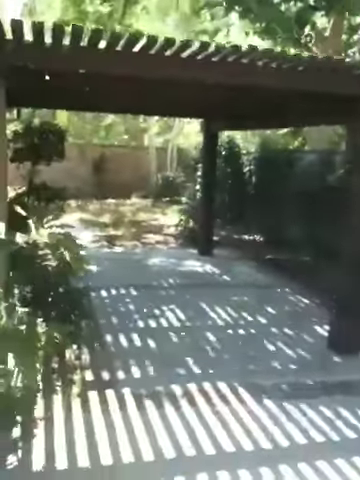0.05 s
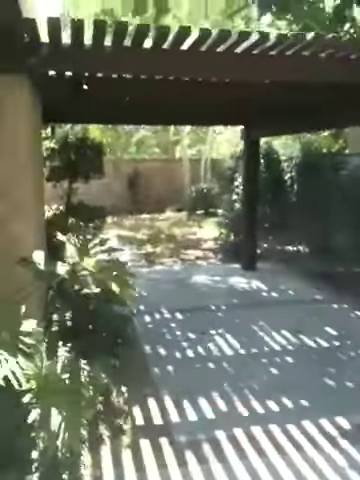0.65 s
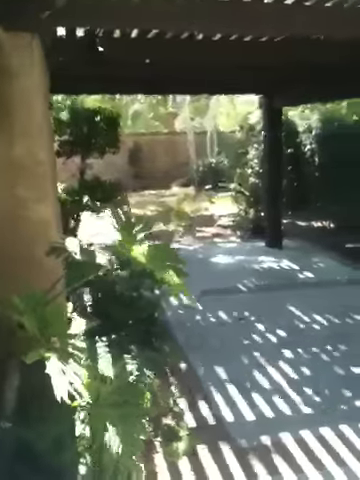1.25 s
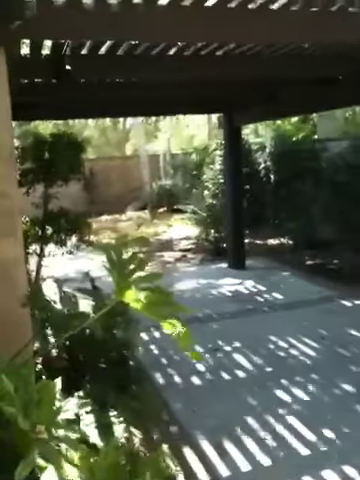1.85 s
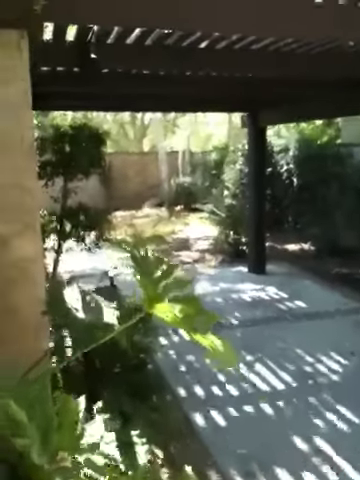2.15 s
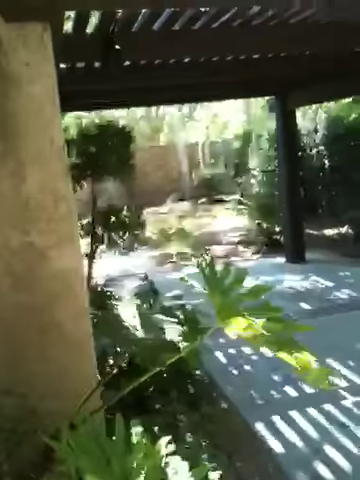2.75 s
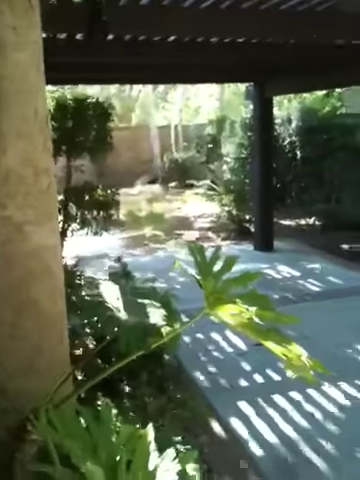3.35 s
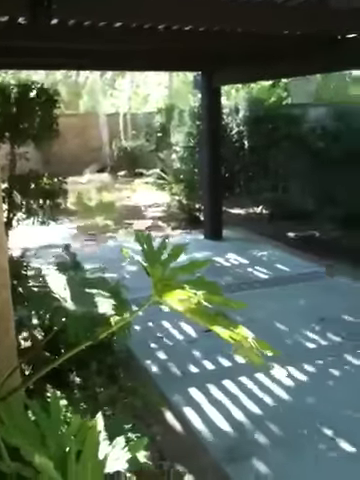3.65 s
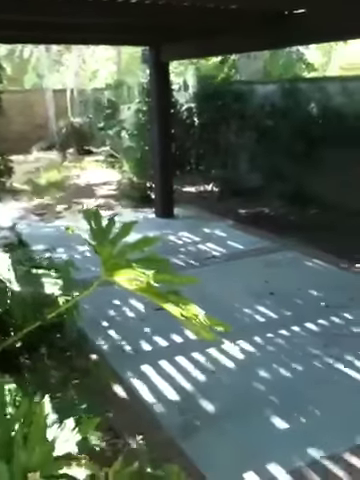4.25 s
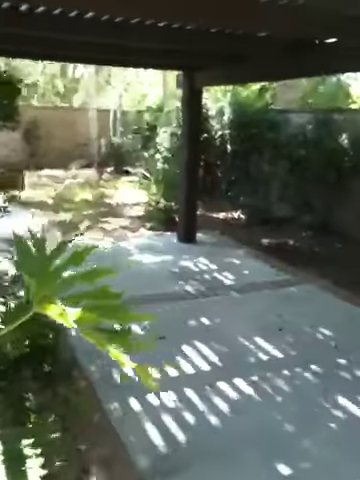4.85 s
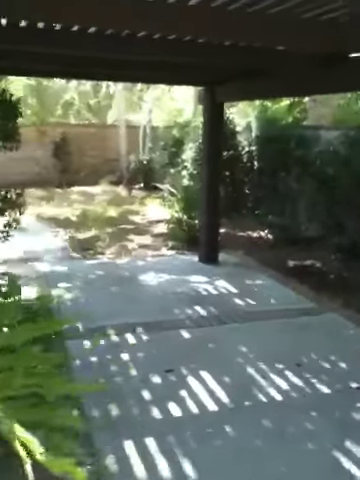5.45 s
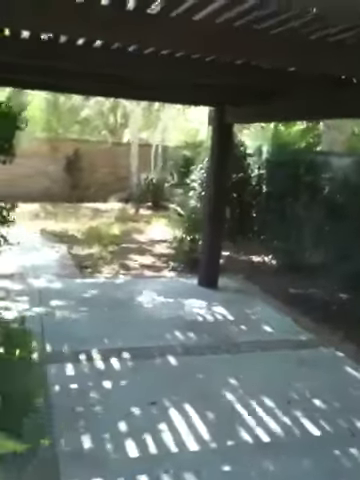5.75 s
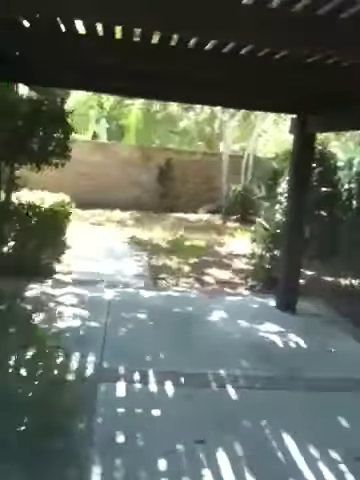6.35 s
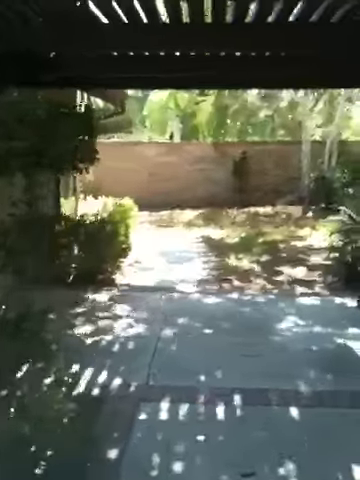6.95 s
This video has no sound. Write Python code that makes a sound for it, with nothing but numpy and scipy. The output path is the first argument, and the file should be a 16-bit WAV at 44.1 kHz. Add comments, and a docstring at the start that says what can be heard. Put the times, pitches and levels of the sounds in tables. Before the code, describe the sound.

A big leaf brushes the microphone with a loud crackle and raspy drag, over a soft garden hush and faint birdsong.

```python
"""The soft hush of a quiet backyard, then a small bird some way off and puffs of air bumping the microphone.
A phone is being carried past a big-leaved plant. Stalks knock on its case and leaf tips flick it now and
then. Loudest of all, one leaf taps the case, swishes across the microphone in a bright crackle and drags
along the body for a second, sticking and slipping so that the case rings. The bird's arched whistles
carry on over the last light touches."""
import sys
import numpy as np
from scipy import signal
from scipy.fft import rfft, irfft
from scipy.io import wavfile
from scipy.ndimage import uniform_filter1d

SR = 44100
rng = np.random.default_rng(int(sys.argv[2]) if len(sys.argv) > 2 else 0)


def generate_wav(sig):
    """Save sig (samples, or channels by samples) to the path in sys.argv[1] as 16-bit PCM at SR."""
    pcm = np.round(np.clip(np.atleast_2d(sig).T, -1, 1) * 32767).astype(np.int16)
    wavfile.write(sys.argv[1], SR, pcm)


N = 312919
T = np.arange(N) / SR


def amp(db):
    return 10 ** (np.asarray(db) / 20)


def unit(x):
    """Scale to rms 1."""
    return x / np.sqrt(np.mean(x ** 2) + 1e-18)


def colour(x, points, size=4096):
    """Causal EQ through (freq_hz, gain_db) points; white noise keeps its power."""
    hz, db = np.transpose(points)
    f = np.maximum(np.arange(size // 2 + 1) * SR / size, 1)
    low_cut = np.minimum(f / hz[0], 1)
    gain = low_cut * amp(np.interp(np.log(f), np.log(hz), db))
    cepstrum = irfft(np.log(gain))
    cepstrum[1:size // 2] *= 2  # fold to minimum phase
    cepstrum[size // 2 + 1:] = 0
    response = irfft(np.exp(rfft(cepstrum)))
    return signal.fftconvolve(x, response / np.linalg.norm(response))[:len(x)]


def resonate(x, hz, width_hz):
    """One resonance, gain 1 at its centre."""
    return signal.lfilter(*signal.iirpeak(hz, hz / width_hz, fs=SR), x)


def resonate_twice(x, hz, width_hz):
    """The same resonance in series, for steeper skirts."""
    return resonate(resonate(x, hz, width_hz), hz, width_hz)


def walk(per_s):
    """Smooth random modulation with rms 1."""
    step = max(int(SR / per_s), 1)
    held = np.repeat(rng.standard_normal(N // step + 1), step)
    return unit(uniform_filter1d(held, step)[:N])


def crackle(per_s, spread_db):
    """Tiny fibre releases at random moments: many small, a few large."""
    happens = rng.random(N) < per_s / SR
    size = amp(spread_db * np.minimum(rng.exponential(size=N), 4))
    return unit(happens * size * rng.choice([-1, 1], N))


def fall(t, t60):
    """A decay that loses 60 dB in t60 seconds."""
    return np.exp(-np.log(1000) * t / t60)


def after(s):
    """Seconds since time s, 0 before it."""
    return np.maximum(T - s, 0)


def before(s):
    """Seconds until time s, 0 after it."""
    return np.maximum(s - T, 0)


def swells(table):
    """A bell-shaped gain for each (middle_s, level_db, half_length_s) row."""
    return sum(amp(db) * np.exp(-.5 * ((T - s) / half) ** 2) for s, db, half in table)


def burst(envelope, grain):
    """Random grain under an envelope, which alone sets its energy."""
    return unit(envelope * grain) * np.sqrt(np.mean(envelope ** 2))


def add(out, s, x):
    """Mix x in at time s."""
    i = int(s * SR)
    out[i:i + len(x)] += x[:len(out) - i]


# level of the garden bed as the phone is carried along: time_s, murmur_db, hiss_db
HUSH_LEVELS = [(0, -57, -53.5), (1.2, -58, -54.5), (2.3, -58.5, -56), (4.1, -59, -57), (6.2, -57, -55),
               (6.8, -55.5, -54), (7.1, -56.3, -51.5)]
# EQ of the low town murmur: freq_hz, gain_db
MURMUR_EQ = [(25, -46), (50, -18), (90, -9), (160, 0.5), (260, 1.5), (450, -2.5), (1000, -3), (1600, -9.5),
             (3000, -31)]
# EQ of the leafy hiss: freq_hz, gain_db
FOLIAGE_EQ = [(900, -10.5), (1700, -4), (2400, -0.5), (3300, -3.5), (5000, -7.5), (7000, -9), (9200, -10.5),
              (11500, -18.5), (15500, -31)]


def garden():
    """A far murmur of the town under a soft hiss of foliage."""
    s, murmur_db, hiss_db = np.transpose(HUSH_LEVELS)
    murmur_gain = amp(np.interp(T, s, murmur_db) + 0.099 * walk(3.35))
    murmur = colour(rng.standard_normal(N), MURMUR_EQ)
    hiss_gain = amp(np.interp(T, s, hiss_db) + 0.24 * walk(9.2))
    hiss = colour(rng.standard_normal(N), FOLIAGE_EQ)
    return murmur_gain * murmur + hiss_gain * hiss


def whistle(hz, rasp):
    """A near-pure tone on a pitch curve, roughened by a fast tremor and fading at both ends."""
    hz = hz * (1 + rasp * walk(700)[:len(hz)])
    return signal.windows.tukey(len(hz), .35) * np.sin(2 * np.pi * np.cumsum(hz) / SR)


# song notes, each an arch in pitch: crest_s, rise_s, fall_s, crest_hz, end_hz, level_db
SONG_NOTES = [(.705, 0, 0.052, 3270, 2600, -61), (4.63, 0.0093, 0.03, 3760, 3680, -58),
              (4.775, 0.0065, 0.053, 4250, 3080, -57), (5.035, 0.002, 0.026, 3670, 2970, -56),
              (5.148, 0.014, 0.015, 3210, 2800, -51.5), (5.245, 0.0013, 0.037, 4060, 2880, -51.5),
              (5.355, 0.0024, 0.025, 2820, 2600, -54), (5.435, 0.051, 0.041, 3970, 2950, -52.5),
              (5.534, 0.0056, .066, 4060, 2560, -55), (5.744, 0.061, 0.048, 3970, 2600, -53.5),
              (6.095, 0.0017, 0.037, 3180, 2630, -55), (6.338, 0.06, 0.039, 2990, 2300, -55.5)]
# thin high calls that slide down toward a pitch: start_s, pitch_hz, level_db, slide_hz
PEEP_CALLS = [(1.108, 4760, -56.5, 700), (4.39, 4650, -62, 300), (4.72, 4020, -60, 50),
              (6.785, 4030, -53.5, 250)]


def bird(size=16384):
    """Arched whistles and thin peeps, scattered by foliage and echoed by the garden walls."""
    foot_hz, roundness = 2640, 1.3
    peep_s, slide_t60_s = 0.08, 0.118
    flicker_db, echo_db, echo_t60_s = 2.4, -4.5, .22
    song = np.zeros(N)
    for crest, rise, drop, top_hz, end_hz, db in SONG_NOTES:
        up = (top_hz - foot_hz) * np.linspace(1, 0, int(abs(rise) * SR)) ** roundness
        down = (top_hz - end_hz) * np.linspace(0, 1, int(drop * SR)) ** roundness
        add(song, crest - rise, amp(db) * whistle(top_hz - np.r_[up, down], rasp=.016))
    slide = fall(T[:int(peep_s * SR)], slide_t60_s)
    for s, hz, db, slide_hz in PEEP_CALLS:
        add(song, s, amp(db) * whistle(hz + slide_hz * slide, rasp=0.02))
    walls = rng.standard_normal(size) * fall(T[:size], echo_t60_s)
    echo = signal.fftconvolve(song, walls / np.linalg.norm(walls))[:N]
    return song * amp(flicker_db * walk(170)) + amp(echo_db) * echo


# air bumping the microphone: middle_s, level_db, half_length_s
AIR_PUFFS = [(.795, -37.5, 0.018), (.843, -45.5, 0.016), (1.02, -52.5, 0.022), (1.2, -58.5, .054),
             (2.54, -53, 0.024), (4.785, -56.5, .008)]
# EQ of their soft thump: freq_hz, gain_db
PUFF_EQ = [(30, -53), (60, -10), (95, -4), (160, 0.5), (250, -11), (360, -16), (520, -44), (2000, -73)]


def puffs():
    """Eddies of air push on the microphone in soft thumps that stay above the deepest bass."""
    eddies = colour(rng.standard_normal(N), PUFF_EQ)
    strength = np.sqrt(uniform_filter1d(eddies ** 2, size=1500) + 1e-9)
    push = swells(AIR_PUFFS) * eddies / strength  # evened out inside each puff
    return signal.sosfilt(signal.butter(4, 88, "high", fs=SR, output="sos"), push)


# stalks hitting the case: start_s, level_db, clatter_t60_s, body_hz, tick_vs_body_db
STALK_KNOCKS = [(1.333, -49.5, 0.024, 1600, 7), (1.8944, -40, 0.062, 2220, 2),
                (2.164, -52.5, 0.089, 1600, -5), (2.469, -36.5, 0.065, 1224, -3),
                (2.484, -40.5, 0.075, 2420, -5), (2.493, -43, 0.07, 1400, 0),
                (4.293, -49.5, 0.022, 2390, 4.5), (4.8113, -51, 0.034, 1790, 2),
                (5.891, -46.5, 0.029, 3130, -4)]
# hollow ring of a knock: ratio_to_body, level_db, t60_s
HOLLOW_MODES = [(1, -1.5, 0.034), (1.3, -3, .025), (1.66, 0, .025)]
# EQ of the tick and clatter: freq_hz, gain_db
CLATTER_EQ = [(300, -3.5), (900, -1.5), (1500, 0), (2300, 8.5), (3200, -3.5), (5000, -3), (9000, -5),
              (15000, -16)]


def knocks(size=8192):
    """A stalk hits the case: a sharp tick and clatter, a hollow knock and a dull ring."""
    ticks, rings, t = np.zeros(N), np.zeros(N), T[:size]
    for s, db, t60, hz, tick_db in STALK_KNOCKS:
        clatter, push = rng.standard_normal((2, size))
        hollow = sum(amp(mode_db) * fall(t, mode_t60) * np.sin(2 * np.pi * ratio * hz * t)
                     for ratio, mode_db, mode_t60 in HOLLOW_MODES)
        dull = burst(fall(t, t60 * 2.6), resonate_twice(push, hz, width_hz=580))
        envelope = amp(-0.5) * fall(t, t60) + amp(2.5) * fall(t, t60=0.0042)
        add(ticks, s, amp(db + tick_db) * clatter * envelope)
        add(rings, s, amp(db) * (hollow + amp(-1.0) * dull))
    return colour(ticks, CLATTER_EQ) + rings


# leaf tips snapping off the phone: start_s, level_db, spray_t60_s, pitch_hz
TIP_FLICKS = [(1.260, -41.5, 0.016, 6500), (1.333, -44, .014, 4000), (2.002, -47, .006, 8300),
              (2.044, -49.5, .04, 9000), (2.543, -22.5, 0.037, 4030), (2.546, -24.5, .035, 5600),
              (2.563, -19, 0.054, 4200), (2.571, -16, 0.026, 7650), (2.6085, -23, 0.011, 6000),
              (2.702, -19, 0.0086, 8300), (2.710, -22, 0.024, 8400), (2.720, -26, .008, 5800),
              (2.725, -17, 0.0083, 5800), (2.746, -9.5, 0.0083, 5200), (2.761, -17, .006, 9400),
              (2.772, -15.5, 0.0076, 9100), (2.783, -18, .005, 9300), (2.790, -18.5, .013, 9600),
              (2.82, -31, .012, 8000), (3.009, -31.5, 0.062, 6470), (3.155, -28, .015, 6960),
              (3.164, -29, 0.015, 9250), (3.441, -26.5, 0.039, 8100), (3.4534, -25, 0.031, 8000),
              (3.9146, -33.5, 0.007, 8900), (4.499, -36, 0.014, 8000), (4.506, -40.5, 0.06, 5000),
              (4.515, -35, 0.02, 7800), (4.522, -36.5, 0.068, 7660), (4.5917, -42, 0.013, 8800),
              (4.8977, -31.5, .014, 9850), (4.902, -34, 0.033, 9300), (4.9112, -36, 0.049, 10500),
              (5.7105, -43, .02, 4300)]
# light grazes of foliage: middle_s, level_db, half_length_s
LEAF_GRAZES = [(1.99, -60, 0.056), (2.535, -50.5, .014), (4.80, -62.5, 0.059), (4.92, -54, 0.048)]
# crisp EQ of a leaf tip: freq_hz, gain_db
TIP_EQ = [(800, -23), (1700, -13), (2500, -13), (3400, -4.5), (5500, -1.5), (8800, 1), (10500, 0),
          (12500, -7.5), (15500, -14)]
# midrange EQ of a fluttering leaf blade: freq_hz, gain_db
FLUTTER_EQ = [(180, -28), (350, -20), (650, -30), (1200, -9.5), (1380, -10.5), (1900, -6.5), (2850, -4.5),
              (3400, -8), (5000, -8.5), (9000, -18.5)]


def flicks(size=8192):
    """Each leaf tip lets go with a snap, a spray of clicks and its own ring; grazes only whisper."""
    tips, t = np.zeros(N), T[:size]
    rise_s, ring_db = 0.00016, 3
    attack = np.minimum(t / rise_s, 1)
    snap = amp(0.5) * fall(t, t60=0.0023)
    clumps = unit(amp(2.2 * np.tanh(walk(900))))
    for s, db, t60, hz in TIP_FLICKS:
        spray = amp(-1.0) * burst(fall(t, t60), clumps[int(s * SR):][:size])
        push = (snap + spray) * attack * rng.choice([-1, 1], size)
        add(tips, s, amp(db) * (push + amp(ring_db) * resonate(push, hz, width_hz=710)))
    grazes = swells(LEAF_GRAZES) * unit(crackle(9000, 2.6) * amp(1.9 * np.tanh(walk(250))))
    flutter = amp(1.5) * colour(grazes, FLUTTER_EQ)  # a graze also stirs the whole blade
    return colour(amp(-2.5) * tips + grazes, TIP_EQ) + flutter


# soft tips wiping past: middle_s, level_db, half_length_s, pitch_hz
TIP_BRUSHES = [(4.37, -54, 0.012, 8000), (4.608, -53, .004, 9000), (5.719, -55, .007, 8000),
               (6.25, -42.5, .0011, 8200), (6.272, -43.5, .0014, 8800), (6.289, -44, .002, 9000),
               (6.301, -41, 0.0028, 8600)]


def brushes(size=4096):
    """Soft leaf tips wipe past without a snap: each a short, high fizz."""
    out, t = np.zeros(N), T[:size] - T[size // 2]
    for s, db, half, hz in TIP_BRUSHES:
        fibres = colour(rng.laplace(size=size), TIP_EQ)
        bell = np.exp(-.5 * (t / half) ** 2)
        add(out, s + t[0], amp(db) * burst(bell, resonate(fibres, hz, width_hz=2900)))
    return out


# narrow rings of the phone case: pitch_hz, width_hz, level_db
CASE_MODES = [(530, 82, -8), (1878, 32, 0.5), (2085, 12, 5.5), (2385, 14, 1.5), (2777, 23, 2.5),
              (3250, 34, 2), (4027, 27, 3.5), (4450, 15, 5), (5860, 160, -5.5), (8180, 130, -7)]


def case(x):
    """The leaves' contact sets the phone case ringing."""
    rings = sum(amp(db) * resonate(x, hz, width) for hz, width, db in CASE_MODES)
    return amp(-1.31) * (x + amp(-0.5) * rings)


def wander(x, rings_hz, depth_db=4):
    """As the point of contact moves, each ring of the blade comes and goes on its own."""
    return x + sum((amp(depth_db * np.tanh(walk(per_s=55))) - 1) * resonate(x, hz, width_hz=700)
                   for hz in rings_hz)


def cracks(size=1024):
    """Ribs of the blade tick over the edge of the case, each at its own pitch and strength."""
    per_s, spread_db, ring_cycles = 190, 1.5, 40
    low_hz, high_hz = 1830, 4860
    out, t = np.zeros(N), T[:size]
    for when, pitch, chance in rng.random((int(per_s * N / SR), 3)):
        hz = low_hz * (high_hz / low_hz) ** pitch
        db = spread_db * min(-np.log(1 - chance), 3)
        add(out, when * T[-1], amp(db) * fall(t, ring_cycles / hz) * np.sin(2 * np.pi * hz * t))
    return out


# the blade briefly loses its grip: middle_s, share_lost_db, half_length_s
GRIP_LIFTS = [(2.865, -9, 0.014), (3.11, -12, 0.013), (3.365, -9, 0.011), (3.65, -9, 0.011)]
# EQ of the raspy scrape: freq_hz, gain_db
SCRAPE_EQ = [(700, -19), (1100, -13), (1550, -7), (1900, -3), (2300, 1.5), (2800, -5), (3600, -7.5),
             (4300, -4), (5200, -10), (7000, -44)]
# EQ of the friction hiss on top: freq_hz, gain_db
HISS_EQ = [(3500, -2), (5500, 0), (7500, -0.5), (9500, -3), (11500, -11), (15500, -25)]
# EQ of the rumble underneath: freq_hz, gain_db
RUMBLE_EQ = [(100, -23), (200, 0), (330, 2.5), (500, 0), (750, -2.5), (1200, -5), (2000, -26.5)]


def drag():
    """The blade rubs along the case: scrape, cracks, hiss, rumble and boom all follow its pressure."""
    lands_s, firm_s, eases_s, clears_s = 2.74, 3.012, 3.45, 3.816
    press_db_per_s, ease_db_per_s, clear_db_per_s = 31, 23.5, 124
    scrape_db, crack_db, hiss_db, rumble_db, boom_db = -35.5, -33.5, -41, -43, -50.5
    pressure = (T > lands_s) * amp(-press_db_per_s * before(firm_s)
                                   - ease_db_per_s * after(eases_s)
                                   - clear_db_per_s * after(clears_s))
    contact = pressure * np.maximum(1 - swells(GRIP_LIFTS), 0)
    grip = unit(amp(1.3 * np.tanh(walk(110)) + 0.97 * walk(350)))
    scrape = wander(colour(grip * crackle(1600, 0.72), SCRAPE_EQ), rings_hz=(2200, 2900, 4300))
    boom = unit(resonate_twice(crackle(3000, 0.6), hz=174, width_hz=113))  # the whole phone shakes
    ribs = cracks()
    hiss = colour(grip * crackle(5000, 2.8), HISS_EQ)
    rumble = colour(crackle(1500, 0.57), RUMBLE_EQ)
    return (contact * (amp(scrape_db) * scrape + amp(crack_db) * ribs)
            + amp(hiss_db) * pressure ** 0.87 * hiss
            + amp(rumble_db) * pressure * rumble
            + amp(boom_db) * pressure ** 0.44 * boom)


# the blade catches and lets go: start_s, level_db, pitch_hz, t60_s
BLADE_SLIPS = [(2.635, -27, 2670, 0.22), (2.745, -30, 5200, .014), (2.773, -31, 2270, 0.064),
               (2.79, -34.5, 2280, 0.095), (2.888, -27, 2290, 0.087), (2.921, -27, 2350, 0.03),
               (2.9802, -32, 2070, 0.029), (2.98, -33.5, 2920, 0.043), (3.0035, -18, 2830, 0.012),
               (3.01, -28, 2850, 0.086), (3.044, -27, 2260, 0.11), (3.063, -24.5, 2460, 0.026),
               (3.14, -30.5, 3076, 0.1), (3.14, -37, 2110, 0.06), (3.183, -28, 2310, .09),
               (3.185, -34.5, 4260, .09), (3.2255, -27.5, 2180, 0.045), (3.242, -30.5, 2220, 0.07),
               (3.26, -34, 3980, 0.096), (3.29, -31, 2430, 0.2), (3.384, -29.5, 4240, .08),
               (3.398, -25, 2370, 0.032), (3.498, -33, 3250, .09), (3.693, -34.5, 2500, 0.045),
               (4.8973, -44, 2520, 0.038)]


def slips(size=8192):
    """Each time the blade lets go it judders in uneven jerks, at its own pitch and with a broad rasp."""
    out, t = np.zeros(N), T[:size]
    jerks = crackle(per_s=2000, spread_db=2.0)
    rasp = amp(-10) * colour(jerks, FLUTTER_EQ)
    for s, db, hz, t60 in BLADE_SLIPS:
        i = int(s * SR)
        judder = unit(resonate_twice(jerks[i:i + size], hz, width_hz=800))
        add(out, s, amp(db) * burst(fall(t, t60), judder + rasp[i:i + size]))
    return out


# strokes of the leaf edge over the microphone port: start_s, hold_s, level_db
EDGE_STROKES = [(2.55, 0.018, -31.5), (2.639, 0.098, -23)]
# bright EQ of the raking edge: freq_hz, gain_db
SWISH_EQ = [(200, -22), (1000, -17), (3200, -17), (4100, -7.5), (4600, -7), (5850, 0.5), (7100, -4.5),
            (8400, 2), (9500, 1), (10800, -4), (13000, -8), (15500, -14)]


def swish():
    """The leaf edge rakes the port with dense bright crackle while the blade flutters behind it."""
    rise_db_per_s, release_db_per_s = 600, 204
    flutter_db, settle_db_per_s = -5, 55
    edge_gain, flutter_gain = np.zeros(N), np.zeros(N)
    for s, hold, db in EDGE_STROKES:
        stroke = amp(db - rise_db_per_s * before(s) - release_db_per_s * after(s + hold))
        edge_gain += stroke
        flutter_gain += stroke * amp(flutter_db - settle_db_per_s * after(s))
    touching = T > EDGE_STROKES[0][0]
    clumps = unit(amp(4.1 * np.tanh(walk(700))))
    rake = wander(colour(clumps * crackle(12000, 3.1), SWISH_EQ), rings_hz=(4100, 5900, 8200, 9500))
    flutter = colour(clumps * crackle(9000, 0.93), FLUTTER_EQ)
    return touching * (edge_gain * rake + flutter_gain * flutter)


def scene():
    """The plant against the phone, in mono over air puffs, bird and garden."""
    touch = case(swish() + drag() + slips() + flicks()) + brushes() + knocks()
    low_cut = signal.butter(2, 85, "high", fs=SR, output="sos")  # deep bass is cut from the touch sounds
    return (signal.sosfilt(low_cut, touch) + puffs() + bird() + garden())[None]


def record(dry):
    """The phone rounds the loudest peaks and cuts the top."""
    top_hz = 15900
    rounded = np.tanh(1.272 * dry) / 1.333
    return signal.sosfilt(signal.ellip(10, .2, 80, top_hz, fs=SR, output="sos"), rounded)


dry = scene()
out = record(dry)
generate_wav(out)
```